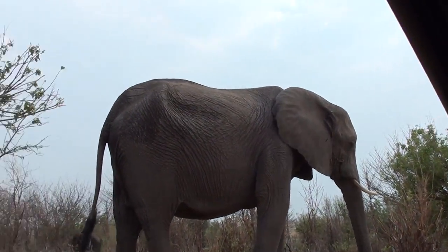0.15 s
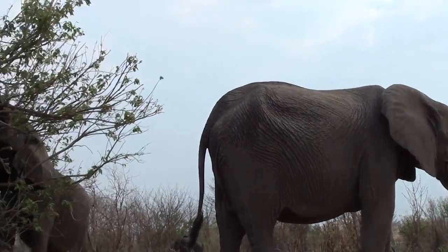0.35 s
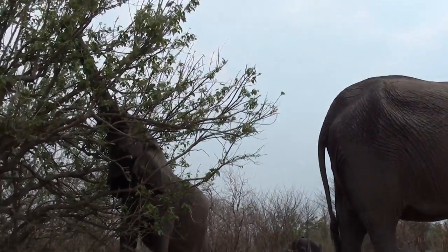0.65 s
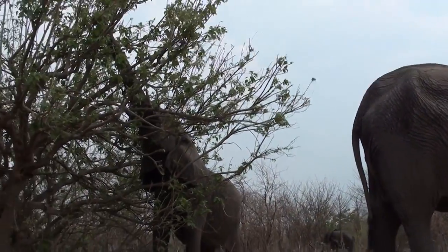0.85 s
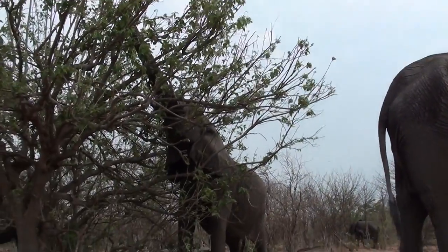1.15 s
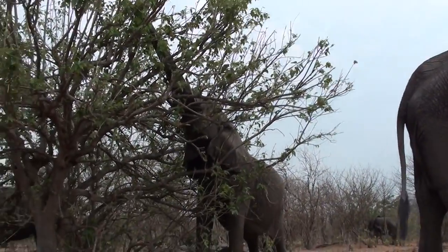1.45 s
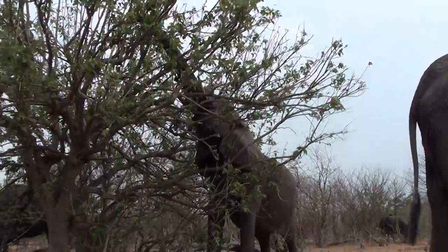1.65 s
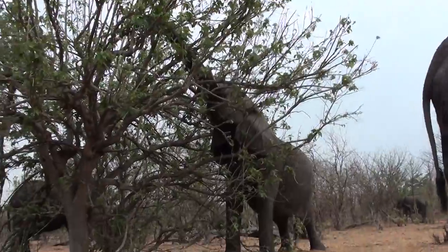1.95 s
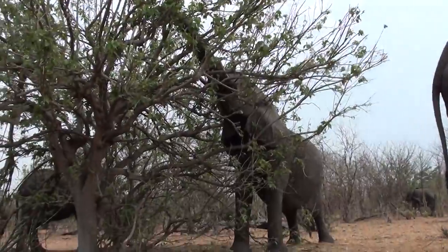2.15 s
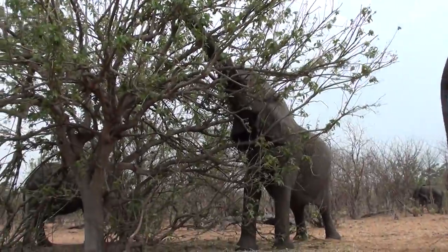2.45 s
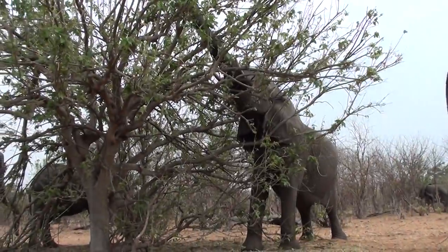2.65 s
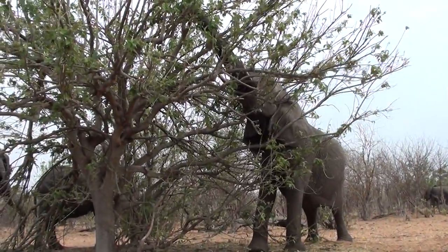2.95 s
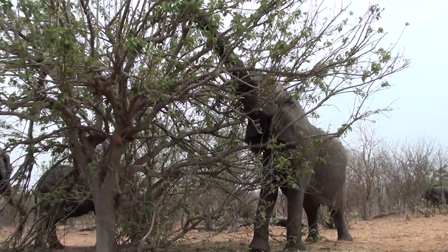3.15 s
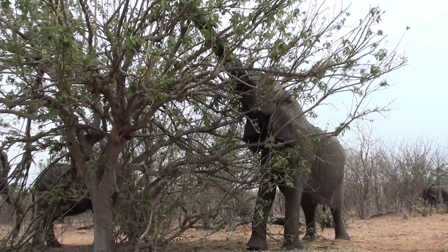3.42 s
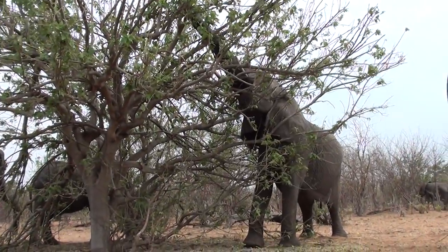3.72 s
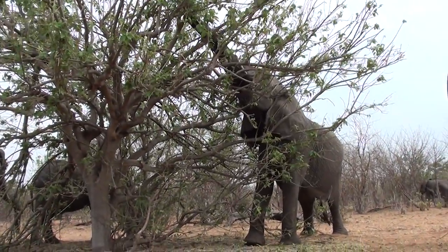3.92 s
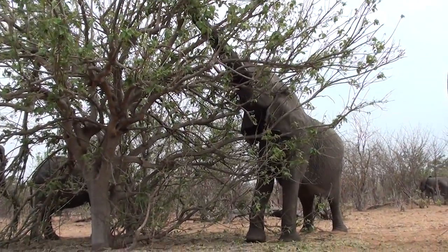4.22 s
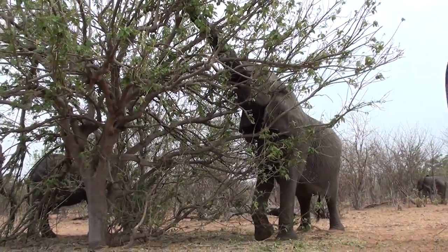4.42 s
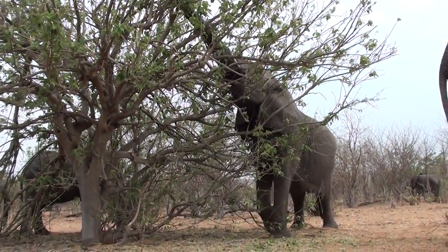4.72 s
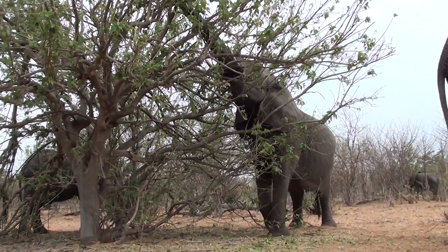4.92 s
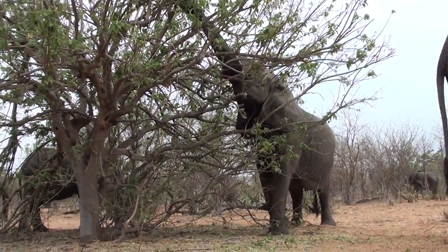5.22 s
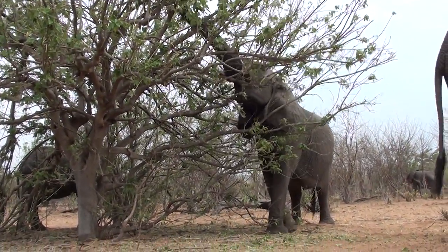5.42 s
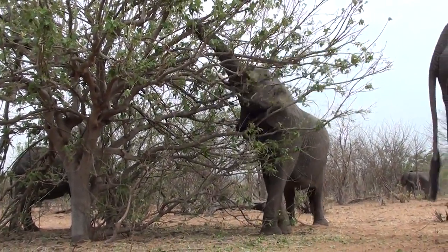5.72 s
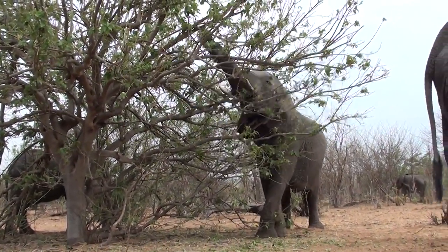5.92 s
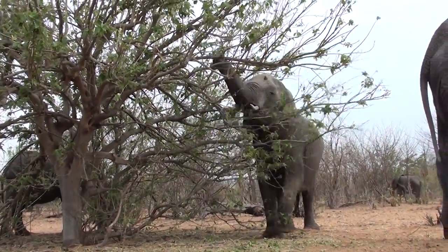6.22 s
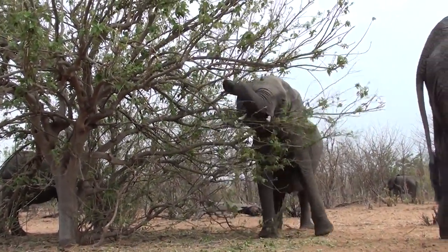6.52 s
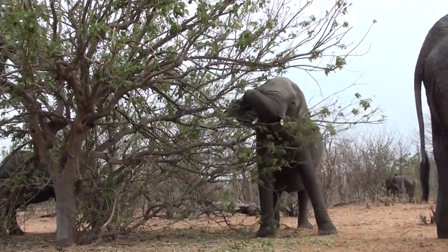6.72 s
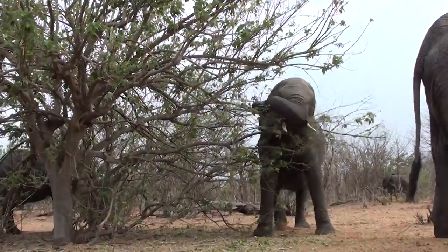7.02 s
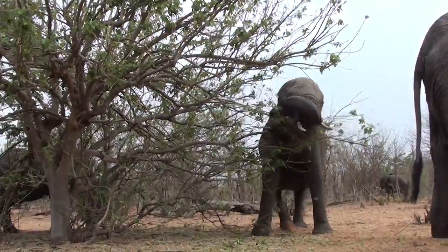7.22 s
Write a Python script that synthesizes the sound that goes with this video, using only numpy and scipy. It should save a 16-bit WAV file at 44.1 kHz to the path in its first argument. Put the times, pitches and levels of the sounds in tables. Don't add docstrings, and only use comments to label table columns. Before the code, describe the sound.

An elephant tears at a leafy tree outdoors, twigs snapping sparsely at first, then a loud splintering burst of cracks amid rustling leaves and trunk breath.

```python
import sys
import numpy as np
from scipy import signal
from scipy.fft import rfft, irfft
from scipy.io import wavfile
from scipy.ndimage import uniform_filter1d

SR = 44100
rng = np.random.default_rng(int(sys.argv[2]) if len(sys.argv) > 2 else 0)


def store_wav(level_fs):
    pcm = np.round(np.clip(np.atleast_2d(level_fs), -1, 1) * 32767)
    wavfile.write(sys.argv[1], SR, pcm.T.astype(np.int16))


def ratio_of_db(decibels):
    return 10 ** (np.asarray(decibels, float) / 20)


N = 324576


def rms_one(x):
    return x / np.sqrt(np.mean(x ** 2) + 1e-20)


def in_time(rows, silent_db=None):
    s, *columns = np.transpose(rows)
    return [np.interp(np.arange(N) / SR, s, c, silent_db, silent_db) for c in columns]


def at_hz(points, hz):
    point_hz, point_db = np.transpose(points)
    return np.interp(np.log(hz), np.log(point_hz), point_db)


def drift(rate_hz):
    r = np.exp(-80 * np.pi * rate_hz / SR)
    slow = signal.lfilter([1], [1, -2 * r, r * r], rng.standard_normal(N // 40 + 2002))
    slow = slow[2000:]
    return np.interp(np.arange(N) / 40, np.arange(len(slow)), rms_one(slow))


def resonate(x, hz, width_hz):
    r = np.exp(-np.pi * width_hz / SR)
    zeros = np.array([1, 0, -1]) * (1 - r * r) / 2
    return signal.lfilter(zeros, [1, -2 * r * np.cos(2 * np.pi * hz / SR), r * r], x)


# f/Hz, level/dB
LEAN = [(60, -1), (240, 0.5), (950, 0.5), (3770, 0.0), (15000, -2)]
# f/Hz, level/dB
OPPOSED = [(60, -35), (300, -22), (1000, -20), (3000, -20), (5500, -13.5), (8000, -13.5), (10500, -19.5),
           (15000, -36)]


def spread(mid, side, hz, wide_db=0.0):
    lean = ratio_of_db(at_hz(LEAN, hz) / 2)
    opposed = ratio_of_db(at_hz(OPPOSED, hz) + wide_db) * side
    return np.array([(mid + opposed) * lean, (mid - opposed) / lean])


def crackle(per_s, size_db, t60_s, share):
    size = ratio_of_db(size_db * np.minimum(rng.exponential(1, N), 4))
    hits = (rng.random(N) < per_s / SR) * size ** 2
    power = signal.lfilter([1], [1, -ratio_of_db(-120 / (t60_s * SR))], hits)
    share = np.clip(share, 0, 1)
    return np.sqrt(1 - share + share * power / power.mean())


def banded(spectrum, grain, patchy_db, patch_hz, wide_db):
    white = rng.standard_normal((2, 2, N)) * grain
    base_hz, octaves = spectrum[1][0], np.log2(spectrum[-1][0] / spectrum[1][0])
    edges = base_hz * 2 ** np.arange(-1 / 3, octaves, 1 / 3)
    out = 0
    for k, (low, high) in enumerate(zip(edges, np.minimum(edges[1:], .45 * SR))):
        band = signal.butter(2, [low, high], "band", fs=SR, output="sos")
        mid, side = signal.sosfilt(band, white[k % 2])
        hz = np.sqrt(low * high)
        level = ratio_of_db(at_hz(spectrum, hz) + patchy_db * drift(patch_hz))
        out = out + level * spread(mid, side, hz, wide_db)
    return rms_one(out)


def tuned_air(peaks, grain, wide_db):
    white = rng.standard_normal((2, N)) * grain
    out = 0
    for hz, width_hz, db in peaks:
        mid, side = resonate(resonate(white, hz, width_hz), hz, width_hz)
        out = out + ratio_of_db(db) * spread(mid, side, hz, wide_db)
    return rms_one(out)


def add(out, s, sound):
    i = round(s * SR)
    out[:, max(i, 0):i + sound.shape[1]] += sound[:, max(-i, 0):N - i]


def splinters(noise, size_db):
    return ratio_of_db(size_db * uniform_filter1d(noise, size=24) * np.sqrt(24))


# f/Hz, level/dB
MICROPHONE = [(300, -16.5), (1000, -9.5), (1600, -7.5), (4500, -6.5), (6200, -7), (8300, -1.5),
              (11000, -11.5), (16000, -24)]
BRIGHT_DB, WOOD_DB = -10.0, -5
WOOD_PER_THICKNESS = 1.37


def coloured(burst, level_db, thickness_db, wide_db):
    hz = np.fft.rfftfreq(burst.shape[1], 1 / SR) + 1
    wood_db = WOOD_DB + WOOD_PER_THICKNESS * thickness_db
    colour_db = at_hz([(1500, wood_db + 4.5), (4000, thickness_db + 0.5), (8500, 0)], hz)
    colour_db = colour_db + at_hz(MICROPHONE, hz)
    mid, side = rfft(burst) * ratio_of_db(level_db + colour_db + BRIGHT_DB + 9)
    return irfft(spread(mid, side, hz, wide_db))


# t/s, level/dB, thickness (middle over bright)/dB, scatter t60/s
BREAKS = [(0.1386, -23.5, -6, 0.085), (1.3174, -19.5, -3.5, 0.089), (1.3836, -28, -7.5, 0.2),
          (1.7287, -24.5, -4, .077), (1.8025, -23, -3.5, 0.05), (1.9984, -31.5, -2, 0.1),
          (2.2437, -18.5, -5.5, 0.13), (2.2627, -26.5, -3, 0.12), (2.583, -24, 5, 0.13),
          (2.9158, -13.5, -5, .11), (3.1318, -23, -7, 0.1), (3.8291, -18.5, -2.5, 0.065),
          (3.9489, -23, -3.5, 0.092), (3.9954, -24.5, -2.5, 0.067), (4.5431, -21.5, -8, 0.077),
          (4.6697, -17, -5.5, 0.044), (5.2133, -25.5, 2.5, 0.044), (5.312, -23.5, -8, 0.2),
          (5.3353, -10.5, -9, 0.06), (5.3568, -15.5, -1.5, 0.077), (5.3906, -7, -4, 0.13),
          (5.4719, -14, -4.5, 0.086), (5.8577, -4, -9, 0.1), (6.0521, -20.5, 3, 0.19),
          (6.1924, -18, -8, 0.063), (6.55, -31, 5.5, 0.27), (6.7275, -17, -3, 0.07),
          (6.9449, -10.5, -11, 0.037), (7.0165, -11.5, -10, 0.085), (7.1306, -18, -5, .046)]
# t/s, level/dB, thickness/dB
TWIGS = [(.5626, -37.5, -19), (.6549, -35, -23), (2.5325, -30, -5), (2.9644, -28.5, -3), (3.0763, -33.5, 3),
         (3.183, -34.5, 1), (3.2806, -28.5, -6), (3.3104, -31, -22), (3.352, -30, -6), (3.494, -36, -10),
         (3.652, -48, 0), (3.666, -28, -2), (4.043, -30.5, -0.5), (4.194, -36, 4), (4.306, -32, -12),
         (4.4982, -32.5, -2), (4.733, -37, -1), (5.043, -33, 0.5), (5.2864, -33, -16), (5.5463, -23.5, -8),
         (5.963, -24.5, 0), (6.1662, -21, -1), (6.2681, -28.5, 7), (6.33, -25, -2), (6.3956, -21.5, -5.5),
         (6.471, -24, -15), (6.647, -26, 2.5), (7.0576, -25, 3.5), (3.712, -38, -15), (3.92, -38, -4)]
# t/s, level/dB, thickness/dB
STICKS = [(.294, -53.5, 15), (.423, -53.5, 22.5), (.456, -37.5, 9), (.597, -53, 15), (5.843, -35, 18.5),
          (5.914, -38.5, 20.5), (6.555, -39, 19.5), (1.029, -34, 9), (1.2634, -47.5, 22.5),
          (1.701, -39, 11.5), (1.856, -29.5, 3.5), (2.316, -42.5, 14.5), (3.0132, -33.5, 6.5),
          (4.477, -38.5, 8), (4.883, -37, 9.5), (5.1309, -38, 19), (5.983, -29.5, 12), (6.0332, -27, 11)]
TWIG_T60_S, STICK_T60_S = .1, 0.025


def snaps():
    out, lead = np.zeros((2, N)), 128
    t = np.maximum(np.arange(-lead, 8192 - lead) / SR, 0)
    late = ratio_of_db(-24 - 60 * t / .28)
    rows = BREAKS + [(*row, TWIG_T60_S) for row in TWIGS] + [(*row, STICK_T60_S) for row in STICKS]
    for s, level_db, thickness_db, t60_s in rows:
        noise = rng.standard_normal((3, len(t)))
        lags = (rng.uniform(.0002, .0012, 2) * SR).astype(int)
        bright = signal.lfilter([1, -.75], [1], noise[:2])
        crack = bright * splinters(noise[2], size_db=5.5) * ratio_of_db(-6.5 - 60 * t / 0.02)
        scatter = noise[:2] * (ratio_of_db(-2.0) * ratio_of_db(-60 * t / max(t60_s, .02)) + late)
        crack[:, lead + 30:lead + 33] += ratio_of_db(19.5) * np.array([.6, -1, .4])
        crack = crack + 0.42 * np.roll(crack, lags[0], axis=1) - 0.12 * np.roll(crack, lags[1], axis=1)
        burst = (crack + scatter) * np.minimum(t / 0.00085, 1)
        add(out, s - lead / SR, coloured(burst, level_db, thickness_db, wide_db=-1.5))
    return out


def knocks(rows, thump_db, rattle_db, tick_db, late_s, wide_db):
    out, t = np.zeros((2, N)), np.arange(6000) / SR
    for s, peak_db, hz, t60_s in rows:
        push = np.sin(np.pi * np.minimum(t * hz * 3, 1))
        push = (push + 0.13 * np.roll(push, round(0.003156 * SR))) * [[1], [.4]]
        noise = rng.standard_normal((2, len(t)))
        rattle = noise * ratio_of_db(rattle_db - 60 * t / max(t60_s, .01))
        drive = push + signal.lfilter([.3], [1, -.7], rattle)
        width_hz = 2.6 / max(t60_s, .01)
        body = resonate(drive, hz, width_hz)
        body += ratio_of_db(-19.5) * resonate(drive, hz * 0.75, 2.1 * width_hz)
        body += ratio_of_db(-25.5) * resonate(drive, hz * 1.5, 1.0 * width_hz)
        body += ratio_of_db(thump_db) * resonate(drive, hz * 0.35, hz * 0.072)
        tick = resonate(noise * ratio_of_db(-60 * t / 0.0074), 1340, 1370)
        mid, side = (body / np.abs(body[0]).max() + ratio_of_db(tick_db) * tick) * ratio_of_db(peak_db)
        add(out, s + late_s, spread(mid, side, hz, wide_db))
    return out


# t/s, peak level/dB, f/Hz, t60/s
RINGS = [(1.028, -34, 2500, 0.03), (1.028, -32, 4900, 0.033), (1.2635, -38, 2050, 0.026),
         (1.316, -37, 2460, 0.049), (1.73, -32, 2120, 0.029), (2.2448, -26.5, 3000, 0.04),
         (2.263, -33, 3020, .03), (2.5835, -27, 4060, 0.021), (2.917, -19, 3140, 0.014),
         (3.828, -41, 4570, 0.051), (3.948, -37, 1940, 0.035), (5.132, -34, 2380, 0.037),
         (5.3353, -30, 3000, 0.087), (5.3909, -20, 2730, 0.03), (5.405, -27, 3000, .06),
         (5.4715, -25.5, 2960, 0.057), (5.556, -31, 3040, 0.072), (5.6504, -28, 4460, 0.04),
         (5.859, -19.5, 5230, 0.026), (6.0337, -20, 1960, 0.036), (6.0527, -22.5, 1890, 0.025),
         (6.792, -21.5, 4310, 0.033), (5.3911, -4.5, 5900, 0.0083), (5.3353, -19, 5370, .015),
         (5.4715, -13, 6430, 0.013), (5.8575, -15, 6800, 0.018), (5.862, -18, 1980, .02),
         (6.0345, -30, 2900, 0.017), (6.056, -33, 3600, .05), (6.796, -23, 5530, 0.028),
         (5.358, -24, 4530, .04), (6.167, -24, 8430, .015), (6.192, -16, 7200, .012),
         (2.5835, -21, 6700, .008), (1.3835, -33, 12100, .006), (1.318, -39, 1730, .02),
         (5.8575, -12.5, 11600, .006), (2.244, -22, 11500, .006)]


def split_wood():
    return ratio_of_db(-3.0) * knocks(RINGS, thump_db=-61.0, rattle_db=-8.0, tick_db=-37.0,
                              late_s=.0005, wide_db=0.0)


# t/s, peak level/dB, f/Hz
KNOCKS = [(0.291, -46, 1060), (0.464, -41.5, 1250), (.535, -36.5, 760), (0.599, -44, 790),
          (1.0282, -29.5, 924), (1.261, -39, 1370), (1.322, -40, 1130), (1.698, -43, 850),
          (1.856, -39, 825), (2.919, -34, 1730), (3.826, -34.5, 1950), (3.947, -39.5, 1310),
          (4.143, -43.5, 1850), (4.475, -40.5, 1660), (5.129, -35, 956), (5.206, -33.5, 990),
          (5.392, -51, 1620), (5.842, -33, 746), (5.981, -29, 1280), (6.032, -28.5, 720), (6.04, -32, 1070),
          (6.267, -38, 1130), (7.148, -37, 1250)]
# t/s, peak level/dB, f/Hz, t60/s
THUDS = [(0.419, -42.5, 288, 0.011), (0.462, -34, 283, 0.015), (0.526, -44, 764, 0.057),
         (.597, -41, 333, 0.019), (0.658, -44.5, 275, 0.024), (1.027, -32, 682, 0.028),
         (1.026, -45, 160, 0.023), (1.026, -35, 1290, 0.021), (1.026, -40, 400, 0.017),
         (2.247, -42, 710, 0.037), (2.262, -39.5, 720, 0.06), (2.563, -40, 154, 0.073),
         (2.832, -47, 300, .035), (3.357, -36, 577, 0.069), (4.081, -48, 305, 0.04),
         (4.384, -44, 293, 0.046), (4.666, -40.5, 260, 0.08), (5.354, -37, 253, 0.068),
         (5.405, -29, 610, 0.035), (6.691, -40, 187, 0.076), (4.69, -45, 158, 0.12),
         (5.431, -40.5, 119, 0.18), (.47, -41.5, 625, 0.068), (7.233, -36, 179, 0.11),
         (7.15, -42, 203, 0.11)]
KNOCK_T60_S = 0.026


def struck_wood():
    struck = [(*row, KNOCK_T60_S) for row in KNOCKS] + THUDS
    return knocks(struck, thump_db=-20.5, rattle_db=1.0, tick_db=1.5, late_s=0.00256, wide_db=6.0)


# f/Hz, level/dB
LIMB_DEEP = [(246, 0), (316, -1), (445, -8.5)]


def limb_tones(waver, rough_db):
    out = 0
    for hz, db in LIMB_DEEP:
        turn = 2 * np.pi * np.cumsum(hz * (1 + waver * drift(9.76))) / SR
        steadier = (LIMB_DEEP[0][0] / hz) ** 2
        strength = ratio_of_db(db + rough_db * drift(22) * steadier)
        out = out + strength * spread(np.sin(turn), np.cos(turn), hz, wide_db=-16.0)
    return rms_one(out)


# t/s, deep level/dB, upper level/dB
GROAN = [
    (5.33, -62, -60),
    (5.35, -48, -52),
    (5.5, -46, -48),
    (5.62, -41.5, -54),
    (5.76, -43.5, -48),
    (5.88, -57, -48.5),
    (6.05, -63, -47),
    (6.1, -70, -47),
]
# f/Hz, width/Hz, level/dB
LIMB_UPPER = [(748, 170, 3.5), (800, 55, -18), (1125, 65, 3.5)]


def groan():
    deep_db, upper_db = in_time(GROAN, -150)
    slips = crackle(50, size_db=-1.0, t60_s=0.046, share=0.33)
    deep = ratio_of_db(deep_db - 4.0) * limb_tones(waver=0.012, rough_db=2.5)
    return deep + ratio_of_db(upper_db - 1.5) * tuned_air(LIMB_UPPER, slips, wide_db=-8.0)


# t (middle)/s, level/dB, thickness/dB,
# half length/s
SWISHES = [(0.371, -41, 3.5, 0.03), (2.566, -38, 8.5, 0.012), (2.774, -35.5, -5, 0.0073),
           (6.286, -20, -18, .0015), (6.524, -21, -20, 0.0014), (6.72, -31, -13, .0015),
           (1.17, -35, -3, 0.0023), (3.825, -32, 2, .003), (5.902, -23, 1, 0.0051),
           (3.136, -21.5, -13, 0.0047), (3.435, -27.5, -9, 0.028), (4.157, -36.5, 4, 0.04),
           (4.545, -31.5, -6, 0.013), (5.649, -18, 0, 0.016), (5.833, -33, 7.5, 0.031),
           (6.214, -14, -7.5, 0.005), (6.731, -27, 5.5, 0.0079), (6.797, -16.5, -1.5, 0.01),
           (0.013, -38.5, -4, .015), (0.062, -42, -8, .015), (4.168, -43, -12, .03), (4.595, -35, -8, .006),
           (4.637, -36, -16, 0.0063), (4.774, -36.5, 0, 0.049), (3.568, -43, 3, 0.019),
           (1.922, -39, -3.5, 0.088)]


def swishes():
    out, t = np.zeros((2, N)), np.arange(-4096, 4096) / SR
    for s, level_db, thickness_db, half_s in SWISHES:
        noise = rng.standard_normal((3, len(t)))
        burst = noise[:2] * splinters(noise[2], size_db=2.5) * np.exp(-np.abs(t / half_s))
        add(out, s + t[0], coloured(burst, level_db, thickness_db, wide_db=-0.5))
    return out


# t/s, peak level/dB, f/Hz
FLICKS = [(5.624, -30, 11000), (5.648, -18, 8600), (5.715, -44, 7850), (5.8028, -49, 6500),
          (5.8227, -28, 6900), (5.947, -34, 7300), (6.2109, -18, 9500), (6.308, -23, 7500),
          (6.4338, -24, 9000), (6.473, -30, 8500), (6.583, -31, 12000), (6.606, -32, 11500),
          (6.63, -29, 11000), (6.657, -40, 12000), (6.671, -26, 4600), (6.7164, -32, 7800),
          (6.756, -33, 13000), (6.7736, -36, 8200), (6.7922, -22, 6500), (6.866, -26, 9000),
          (5.299, -29, 11000), (5.437, -30, 13000), (5.487, -30, 12000), (5.173, -36, 11000),
          (4.995, -32, 8000), (6.134, -26, 7000), (7.098, -25.5, 3500), (7.355, -25, 7960),
          (.3102, -49, 8900), (.3351, -43, 8400), (.345, -46, 5300), (.389, -38.5, 2400),
          (.4424, -41, 10000), (.49, -41, 11000), (.5252, -45, 9500), (.8395, -39, 7400),
          (.8874, -46, 9500), (.942, -38, 10000), (.9926, -41, 8100), (1.1054, -43, 7000),
          (1.2047, -38, 7300), (1.8023, -23.5, 11700), (1.837, -38, 7000), (2.1066, -40, 8400),
          (2.129, -39.5, 3170), (2.5581, -47, 4400), (2.624, -35, 9500), (2.665, -37, 11000),
          (3.4195, -30, 8700), (3.435, -29, 10500), (3.5473, -42, 8900), (3.6514, -33, 8500),
          (4.07, -34, 5500), (4.147, -37, 7900), (4.2373, -41, 8200), (4.4248, -40, 8200),
          (4.447, -35, 5300), (4.488, -36, 10000), (4.504, -38, 12500), (2.9163, -22.5, 5160)]
FLICK_T60_S, FLICK_WIDTH = 0.013, 0.65


def flicks():
    out, t = np.zeros((2, N)), np.arange(1500) / SR
    for s, peak_db, hz in FLICKS:
        hit = rng.standard_normal((2, len(t))) * ratio_of_db(-60 * t / FLICK_T60_S)
        ring = resonate(resonate(hit, hz, FLICK_WIDTH * hz), hz, FLICK_WIDTH * hz)
        mid, side = ring / np.abs(ring[0]).max() * ratio_of_db(peak_db)
        add(out, s, spread(mid, side, hz, wide_db=-4.0))
    return out


# f/Hz, density/dB
LEAVES = [(880, -39), (1500, -11), (2100, 1), (6000, -1.5), (8080, 5), (9800, -2.5), (12100, -3.5),
          (16000, -22)]


def leaves(level_db):
    fine = crackle(450, size_db=4.5, t60_s=0.011, share=0.23)
    rustle = ratio_of_db(level_db) * banded(LEAVES, fine, patchy_db=3.0, patch_hz=15.7, wide_db=0.5)
    return rustle + 0.56 * resonate(rustle, 7440, 940)


def leaf_ticks():
    white = rng.standard_normal((2, N)) * crackle(70, size_db=5.0, t60_s=.008, share=1)
    band = signal.butter(2, [6500, 15500], "band", fs=SR, output="sos")
    mid, side = signal.sosfilt(band, white)
    return rms_one(spread(mid, side, 10000, wide_db=-8.0))


# f/Hz, density/dB
BRANCHES = [(180, -34), (300, 3), (877, 8), (2740, 0.5), (4000, 1), (5200, 4), (8800, -120)]


def branches(level_db):
    coarse = crackle(73, size_db=-2.0, t60_s=0.072, share=0.34)
    return ratio_of_db(level_db) * banded(BRANCHES, coarse, patchy_db=2.5, patch_hz=7.5, wide_db=2.5)


# f/Hz, density/dB
RUMBLE = [(24, -41), (40, -10), (204, 0), (344, -8), (600, -12), (780, -48), (1320, -120)]
RUMBLE_DB, RUMBLE_FOLLOWS = -60.5, 0.76


def rumble(branches_db):
    low_db = RUMBLE_DB + RUMBLE_FOLLOWS * (branches_db - branches_db.mean())
    return ratio_of_db(low_db) * banded(RUMBLE, 1, patchy_db=2.5, patch_hz=4.3, wide_db=2.0)


# t/s, leaf shake level/dB, limb sway level/dB
SHAKE = [(0.0, -58, -59), (0.61, -58, -59.5), (1.72, -58, -60.5), (1.86, -50, -56), (2.0, -50, -50),
         (2.12, -57.5, -61), (2.64, -55.5, -53), (3.24, -53.5, -58), (4.47, -54.5, -57.5),
         (4.84, -56.5, -53.5), (5.08, -48, -52), (5.53, -42.5, -48), (5.64, -48.5, -42), (5.84, -41.5, -49),
         (6.6, -42.5, -48.5), (6.77, -38, -43.5), (6.91, -36.5, -50), (7.36, -41.5, -47.5)]
TICKS_DB = -22.0


def crown():
    leaves_db, branches_db = in_time(SHAKE)
    ticks = ratio_of_db(leaves_db + TICKS_DB) * leaf_ticks()
    return leaves(leaves_db) + ticks + branches(branches_db) + rumble(branches_db)


def blow(rows, width_hz):
    level_db, _ = in_time(rows, -150)
    _, centre_hz = in_time(rows)
    low = signal.butter(2, width_hz / 2, fs=SR, output="sos")
    slow = signal.sosfilt(low, rng.standard_normal((4, N)))
    turn = 2 * np.pi * np.cumsum(centre_hz) / SR
    mid, side = slow[:2] * np.cos(turn) + slow[2:] * np.sin(turn)
    return ratio_of_db(level_db) * rms_one(spread(mid, side, np.mean(centre_hz), wide_db=-32.0))


# t/s, level/dB, resonance f/Hz
BLOWS = [
    [(1.82, -73, 1980), (1.946, -50.5, 2060), (2.08, -75, 2030)],
    [(6.5, -50.5, 1146), (6.806, -42, 1342), (7.36, -50, 1178)],
    [(4.0, -65, 2294), (4.17, -56, 2200), (4.23, -74, 2400)],
]


def trunk():
    early, strong, faint = BLOWS
    strong_pair = ratio_of_db(-1.5) * (blow(early, width_hz=370) + blow(strong, width_hz=450))
    return strong_pair + blow(faint, width_hz=710)


# t/s, level/dB
HISS = [
    (0.72, -66),
    (.82, -53),
    (1.03, -43),
    (1.25, -50.5),
    (1.6, -50.5),
    (1.85, -65),
]
# f/Hz, width/Hz, level/dB
HISS_PEAKS = [(7270, 520, 0.5), (8200, 590, 2), (8700, 510, -1), (9250, 300, -11), (10000, 400, -5)]


def insect():
    level_db, = in_time(HISS, -150)
    return ratio_of_db(level_db - 6.5) * tuned_air(HISS_PEAKS, ratio_of_db(2.5 * drift(30)), wide_db=7.5)


# f/Hz, density/dB
AIR = [(30, 6), (150, 4), (500, -1), (2000, -11.5), (6000, -4.5), (11000, -9), (15600, -3), (16300, -36)]
# f/Hz, density/dB
AIR_AROUND = [(24, -51), (40, -19), (425, 2.5), (2730, -6), (7270, -16.5), (8590, -20), (12000, -52),
              (22000, -120)]
AIR_DB, AROUND_DB = -61.5, -61.5


def air():
    hz = np.fft.rfftfreq(N, 1 / SR) + 1
    ahead, around = rfft(rng.standard_normal((2, N)))
    ahead = ratio_of_db(AIR_DB) * rms_one(irfft(ahead * ratio_of_db(at_hz(AIR, hz)), N))
    around = ratio_of_db(AROUND_DB) * rms_one(irfft(around * ratio_of_db(at_hz(AIR_AROUND, hz)), N))
    return np.array([ahead + around, ahead - around])


def scene():
    wood = snaps() + split_wood() + struck_wood() + groan()
    foliage = swishes() + flicks() + crown()
    return wood + foliage + trunk() + insect() + air()


def band_limit(x):
    return signal.sosfilt(signal.butter(12, 16810, fs=SR, output="sos"), x)


def record(dry):
    top_cut = signal.cheby2(24, 50, 16250, fs=SR, output="sos")
    bass_cut = signal.butter(2, 33, "high", fs=SR, output="sos")
    mix = signal.sosfilt(bass_cut, signal.sosfilt(top_cut, dry))
    return band_limit(mix)


dry = scene()
out = record(dry)
store_wav(out)
```